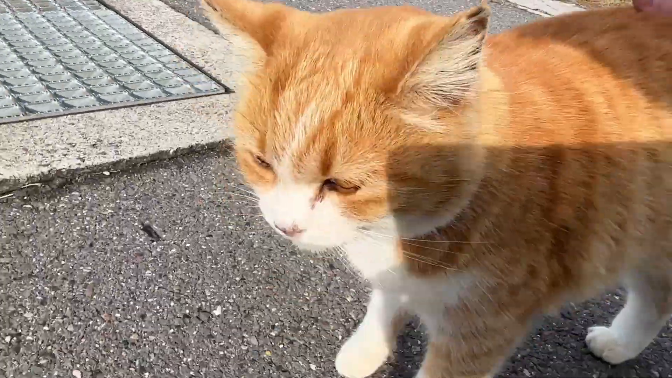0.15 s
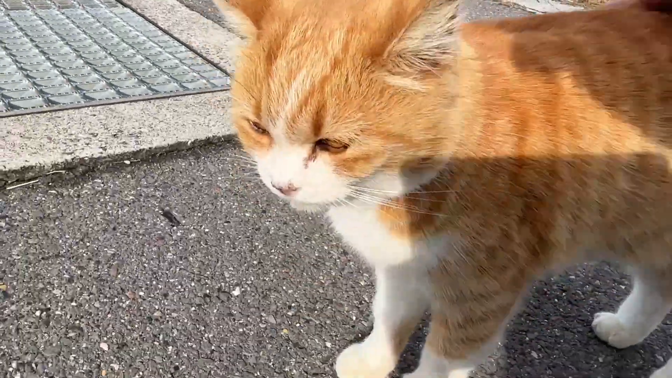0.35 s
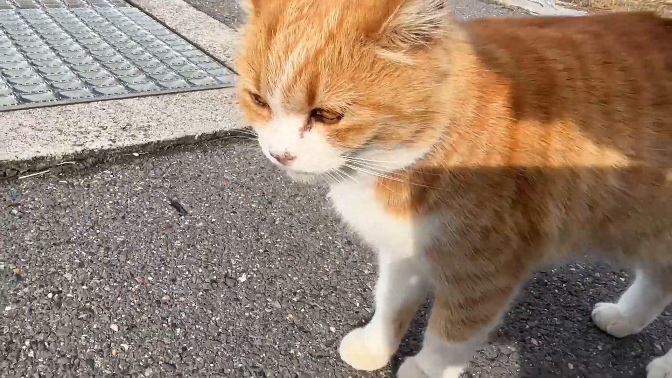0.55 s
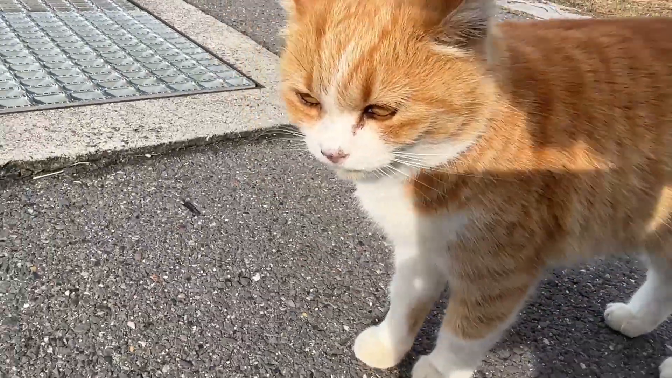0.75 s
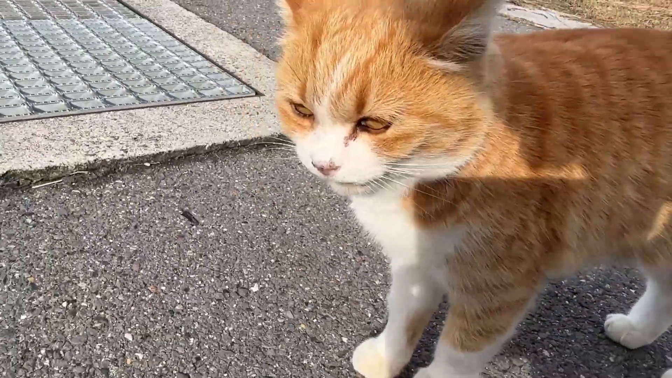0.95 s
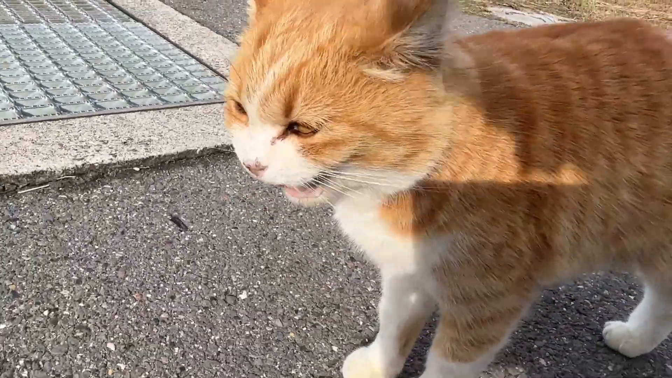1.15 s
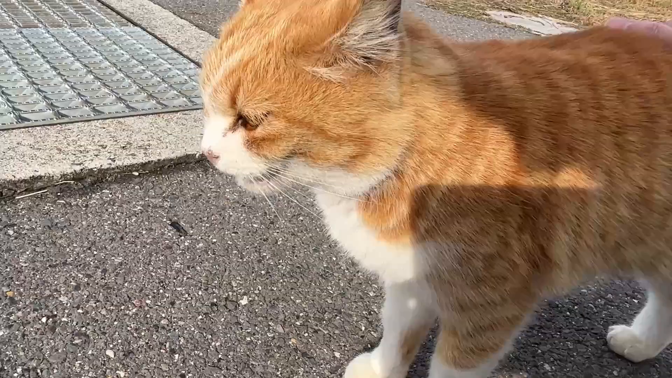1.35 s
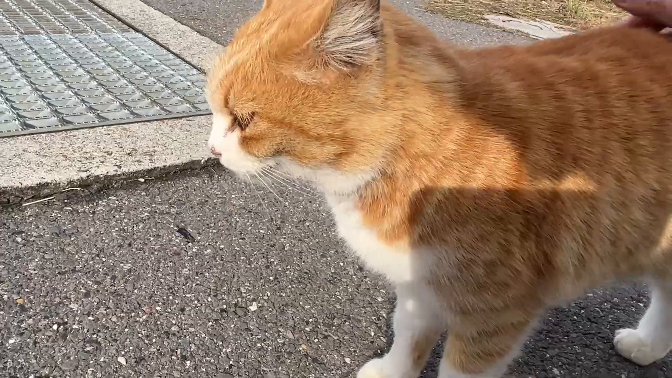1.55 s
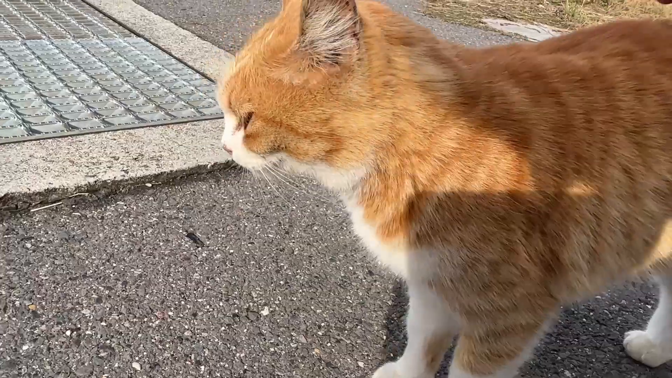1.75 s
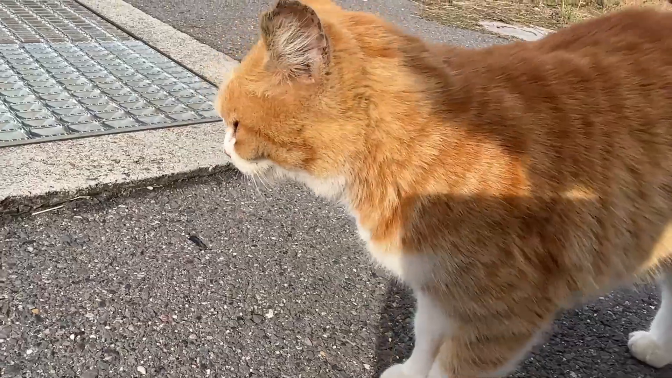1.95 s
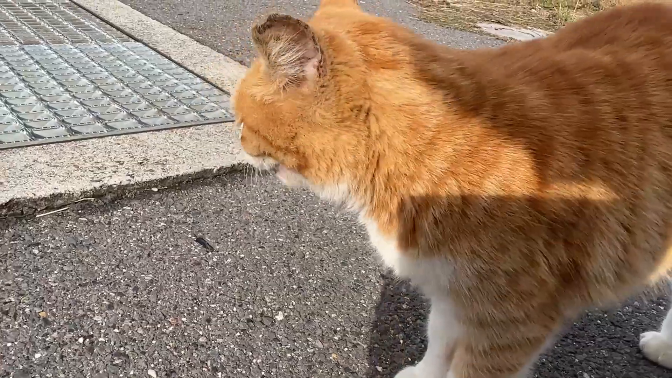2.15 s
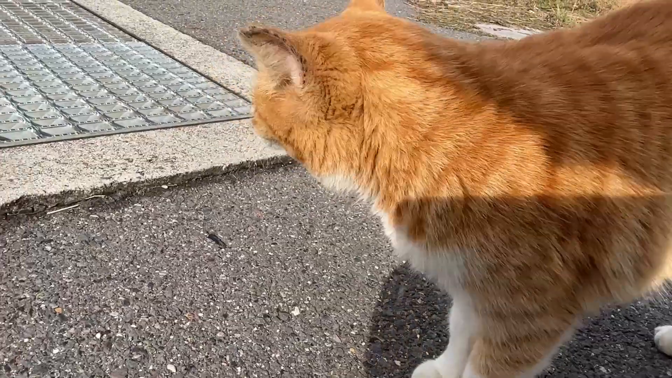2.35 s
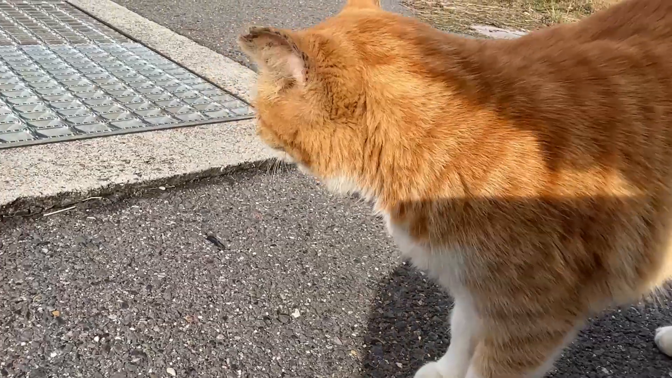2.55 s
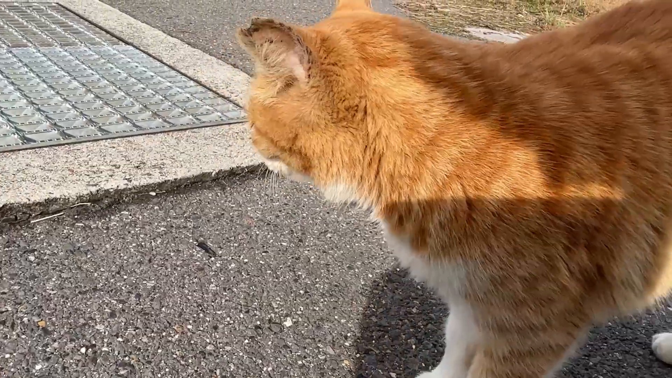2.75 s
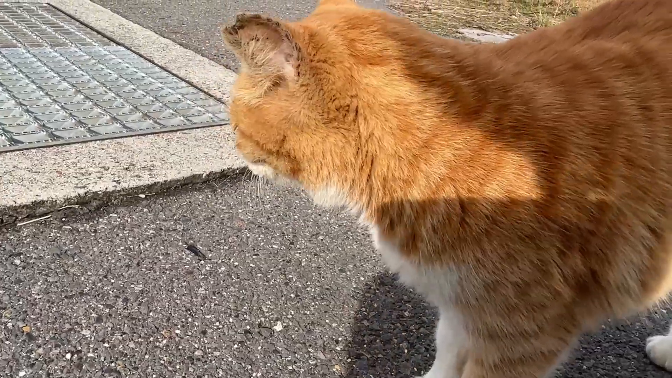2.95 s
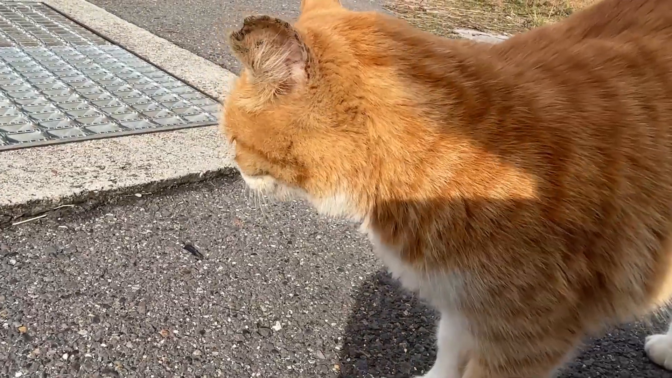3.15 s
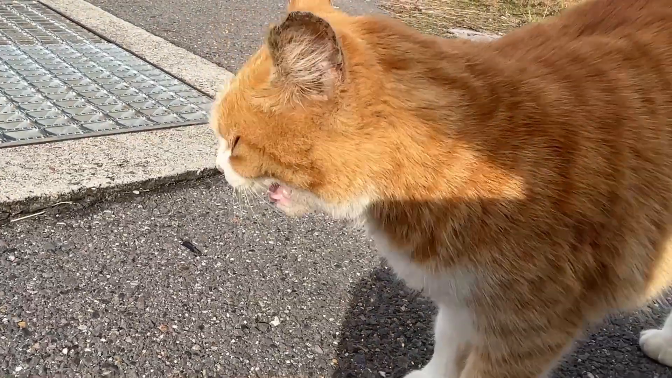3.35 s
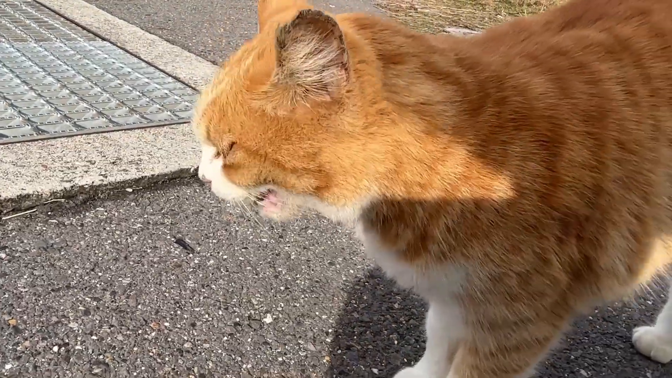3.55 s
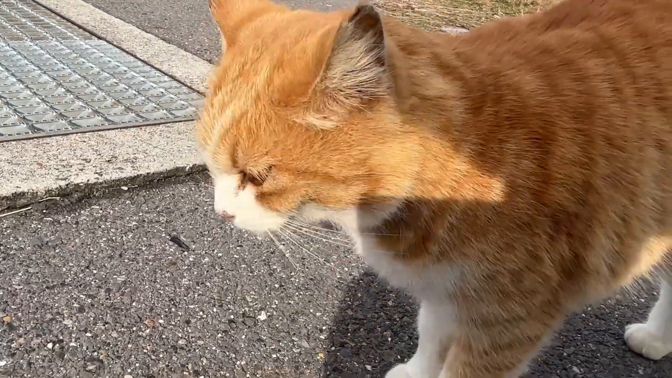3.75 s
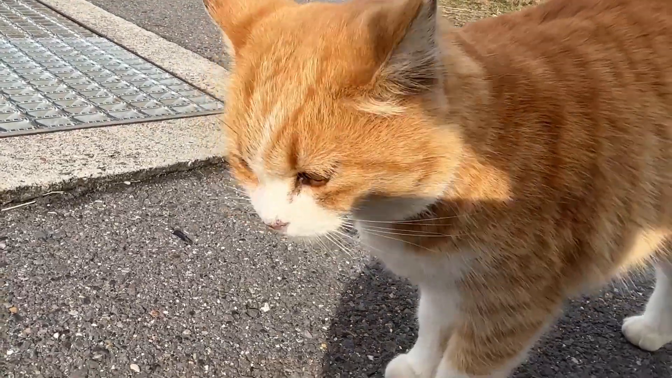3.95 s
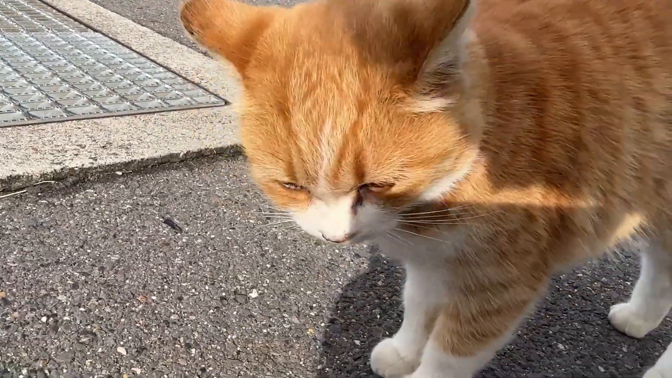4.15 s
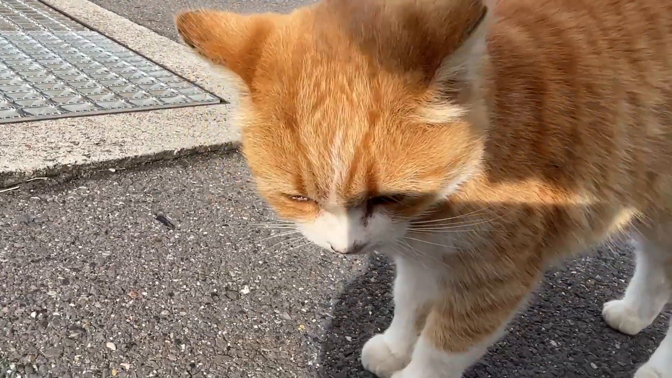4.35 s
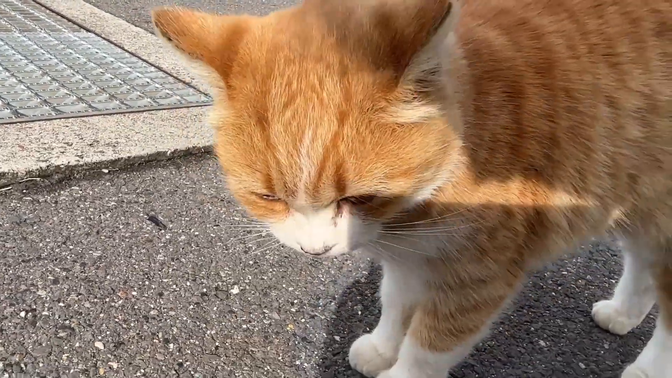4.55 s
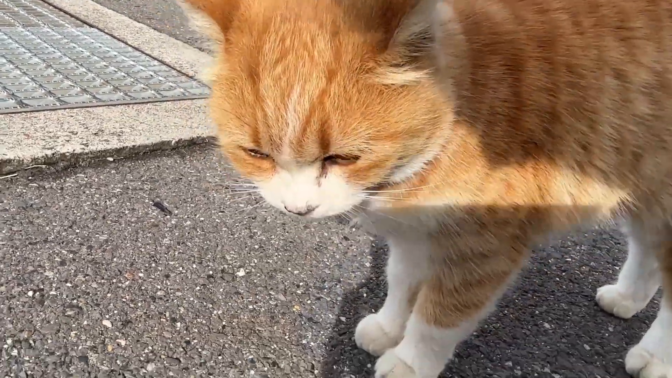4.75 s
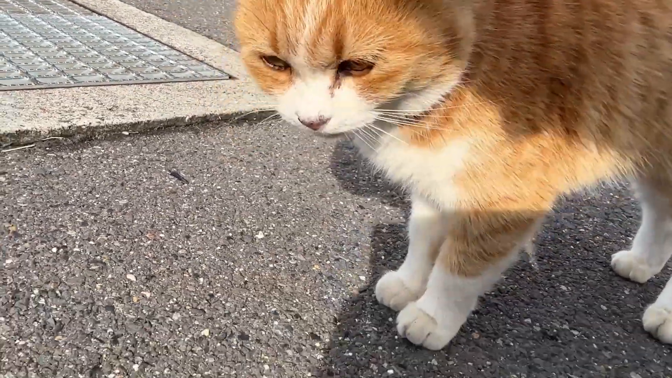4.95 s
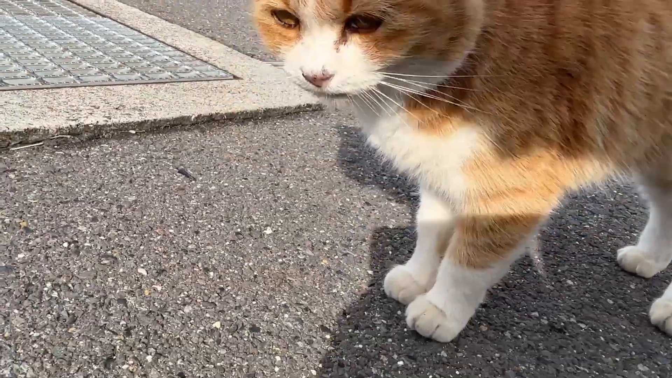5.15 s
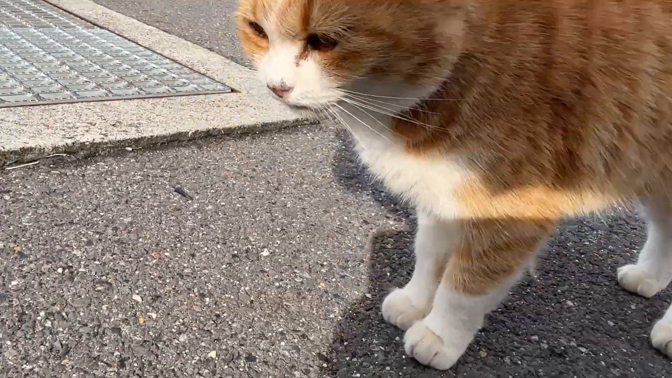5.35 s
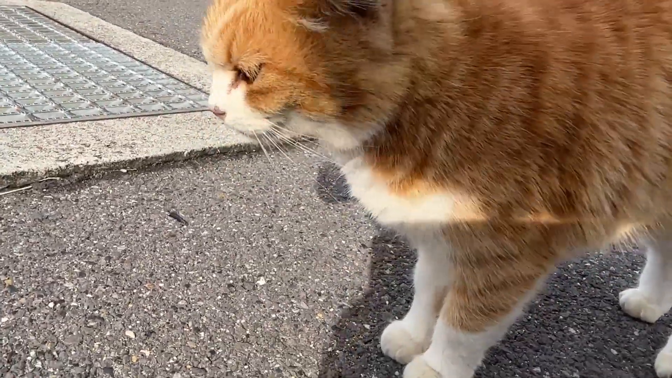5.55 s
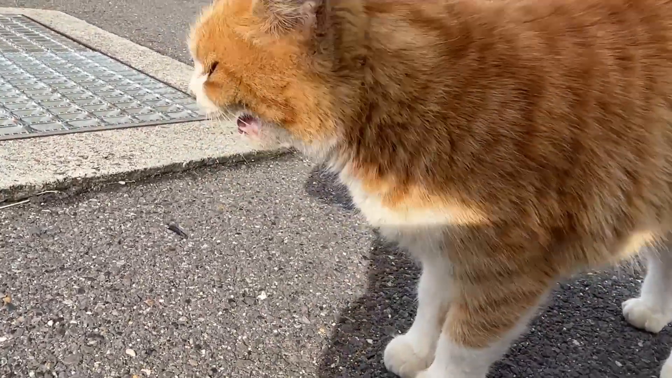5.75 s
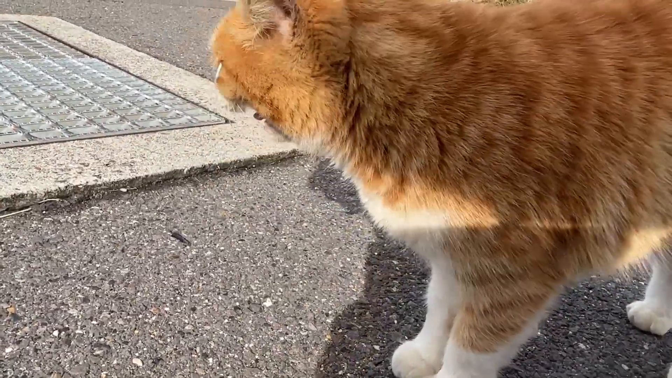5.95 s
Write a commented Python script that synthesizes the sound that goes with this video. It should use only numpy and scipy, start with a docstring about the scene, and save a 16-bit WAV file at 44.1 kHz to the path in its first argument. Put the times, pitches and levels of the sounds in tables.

```python
"""A cat trills four arched meows and two small murmurs close to a phone on an open pavement: fold harmonics
ring through throat, mouth and sinus, a purring muscle twitches through each call, breath hisses at some ends.
Sparrows chirp nearby as mostly arched whistles and falling flicks, with wall echoes; grit and handling tick
as short noise bursts in the housing. Far traffic hums as patchy noise with fuzzy engine drones."""
import sys
import numpy as np
from scipy import signal
from scipy.fft import rfft, irfft
from scipy.io import wavfile
from scipy.ndimage import uniform_filter1d

SR = 44100
rng = np.random.default_rng(int(sys.argv[2]) if len(sys.argv) > 2 else 0)


def inscribe(sig):
    """Save sig as 16-bit PCM at rate SR to the path in sys.argv[1].

    A 1-D sig is mono; a 2-D sig holds one channel per row.
    Samples are clipped to [-1, 1] before scaling.
    """
    pcm = np.round(np.clip(np.atleast_2d(sig).T, -1, 1) * 32767)
    wavfile.write(sys.argv[1], SR, pcm.astype(np.int16))


N = 268569  # samples

# Far traffic, spectrum shared by both ports: (frequency [Hz], relative density [dB])
HUM_SPECTRUM = [(12, -48), (20, -9.5), (60, 4), (146, -2.5), (216, -7), (574, -29.5), (1000, -33.5),
                (2200, -38.5), (3340, -41.5), (4060, -41), (4940, -45), (6910, -45.5), (9950, -67.5),
                (13900, -53), (16000, -93.5)]
# Far traffic, spectrum of the part opposite in sign at the ports: (frequency [Hz], relative density [dB])
HUM_SIDE_SPECTRUM = [(12, -35.5), (20, -2), (216, 0.5), (897, -18), (1060, -14), (1150, -17.5), (2320, -21),
                     (2670, -18.5), (3440, -30), (3950, -27.5), (4940, -30.5), (10200, -35), (12800, -47),
                     (14700, -54), (16000, -59.5)]
HUM_DB, HUM_SIDE_DB = -44, -58  # rms of the shared and opposite parts
# Fuzzy engine drones: (centre [Hz], width [Hz], level [dB])
DRONES = [(59.25, 17, -51), (120.2, 6.2, -51.5), (153, 6.9, -59), (188.4, 12, -62.5)]
# Traffic at the two ports: (frequency [Hz], left over right [dB])
HUM_BALANCE = [(60, 0), (180, -2.5), (550, -3), (1650, 2), (4970, 4.5), (15000, -2.5)]
# Traffic at the two ports: (frequency [Hz], left leads by [rad])
HUM_LEAD = [(0, 0.021), (300, 0.081), (1200, 0.3), (4000, 1), (16000, 0.22)]

# Grit and handling: (time [s], level [dB], treble tilt [dB], middle band lift [dB], decay by 60 dB [s])
TICKS = [(.132, -57, -8, -1.5, 0.029), (0.141, -47.5, 0, -7, 0.026), (0.185, -51, -7.5, 10.5, 0.012),
         (.225, -46.5, 1, 10, 0.081), (0.299, -53, 7, 2.5, 0.1006), (0.346, -58, -4.5, 3, 0.22),
         (0.405, -47.5, -10.5, -9, 0.02), (0.439, -56, -0.5, -2, 0.15), (.517, -52, 1, 2, .028),
         (.646, -39, 7.5, -10.5, 0.028), (.825, -37, 1, -7.5, 0.041), (1.002, -37.5, 1.5, -15, 0.023),
         (1.505, -58, -2.5, -3, .02), (2.886, -72.5, 29, -7, 0.019), (3.051, -43.5, 3, -0.5, 0.015),
         (3.579, -49, 9.5, -6, .025), (3.721, -56.5, 6, 4.5, 0.036), (4.07, -56, 3, 0, .025),
         (4.599, -55, 3, 0, 0.023), (5.14, -42, 0.5, -1.5, .02), (5.189, -55, 1, 5, .022),
         (5.326, -54.5, 4.5, -2, .025), (5.5, -46.5, 1, -4, 0.033), (5.556, -61.5, -8.5, 4, 0.018),
         (5.675, -46.5, -4, -12, 0.03)]
# Low, middle and high bands of the housing: (centre [Hz], width [Hz])
HOUSING_BANDS = [(1200, 1500), (4600, 5000), (11500, 13000)]
HOUSING_BANDS_DB, TICK_RISE_S = (0, -3.5, -16), 0.0017  # band levels before tilt and lift
# Ticks at the two ports: (frequency [Hz], left leads by [rad])
TICK_LEAD = [(0, 6), (1000, 1.28), (5000, 2), (6460, 1.5), (9040, -2), (10600, -4), (12100, -6),
             (13700, -3), (16000, -30)]

# Whistled notes, mostly arched sparrow chirps, with short upward flicks and one faint falling wheeze:
# (time [s], length [s], start [Hz], crest [Hz], end [Hz], crest at [share of length],
# level [dB], overtones re note [dB])
CHIRPS = [(1.197, 0.19, 3650, 4150, 3390, 0.6, -53.5, -20), (1.486, .018, 4408, 5100, 5050, 0.89, -56, -38),
          (1.49, .11, 3280, 5000, 3460, .78, -40.5, -57.5), (1.524, .13, 3190, 4100, 3380, .79, -58, -18.5),
          (1.738, 0.02, 4430, 5400, 5230, .94, -61.5, -28), (1.743, 0.11, 3060, 4740, 3130, 0.68, -43, -49),
          (1.998, 0.087, 3160, 4154, 3480, .89, -50.5, -27.5),
          (2.361, 0.1, 3780, 4690, 4260, .97, -48, -54), (3.651, 0.053, 4160, 4136, 2990, 0.079, -66, -8),
          (3.885, 0.17, 3500, 3858, 3430, 0.31, -58.5, -13),
          (3.933, .091, 3770, 4296, 4060, 0.998, -66, -21),
          (4.182, 0.097, 3180, 3954, 3600, 0.58, -56, -18.5),
          (4.391, 0.16, 3305, 4124, 3390, 0.54, -56.5, -15.5),
          (4.755, 0.09, 3990, 4525, 3900, .9, -50, -26.5), (4.792, 0.1, 3160, 3920, 3400, .98, -55, -16),
          (5.094, 0.016, 4540, 5430, 5550, .9, -60.5, -29.5),
          (5.101, 0.12, 3490, 4645, 3630, 0.56, -49, -33), (5.358, 0.11, 3400, 3916, 3440, 0.45, -55, -18)]
# Falling flicks that close a chirp: (time [s], length [s], crest [Hz], end [Hz], level [dB])
FLICKS = [(1.596, 0.028, 4760, 2840, -46), (1.839, 0.056, 4890, 3120, -54), (2.093, 0.017, 4860, 3260, -55),
          (2.48, .019, 5410, 4266, -62), (4.287, 0.026, 4437, 3600, -72), (4.512, .017, 5400, 4000, -59),
          (4.88, 0.024, 4710, 3650, -50.5), (5.212, 0.034, 3975, 2660, -58.5),
          (5.226, 0.041, 5361, 4429, -67), (5.237, 0.01, 5570, 4500, -63), (5.457, 0.041, 5410, 3840, -70)]
FLICK_START, FLICK_CREST, FLICK_OVERTONES_DB = 1.055, 0.1, -33  # start over crest pitch, share of length, dB
OCTAVE_DB, CHIRP_PAN_DB, FLICK_PAN_DB = 1, 3, 6.5  # octave re overtones, left over right

# Pitch of the taut folds, one table a call: (time [s], pitch [Hz])
FOLD_PITCH = [
    [(.78, 422.4), (.84, 492), (.91, 440)],
    [(.97, 580.4), (1.01, 557.3), (1.045, 585), (1.1, 636.4), (1.2, 675.3), (1.27, 643.3), (1.31, 629.7),
     (1.36, 498.4)],
    [(2.09, 500), (2.12, 569), (2.155, 590)],
    [(2.19, 552), (2.23, 609.6), (2.27, 611.5), (2.31, 652), (2.39, 658), (2.45, 646), (2.51, 629),
     (2.56, 489)],
    [(3.19, 450), (3.25, 525.5), (3.31, 585), (3.34, 581.7), (3.39, 586), (3.44, 621.4), (3.5, 624.3),
     (3.55, 608), (3.63, 516)],
    [(5.63, 471.5), (5.67, 546), (5.72, 540), (5.79, 602.4), (5.85, 611.5), (5.9, 624.3), (5.99, 599.5),
     (6.03, 605), (6.09, 498)],
]
# Mouth, one table a call: (time [s], effort [dB], mouth resonance [Hz], opening [0-1], front resonance [dB])
MOUTH_MOVES = [
    [(0.78, -69.5, 1790, .3, -30), (0.796, -51.5, 1780, 0.06, -35), (0.822, -60, 1770, .2, -20),
     (0.852, -43.5, 1920, 0.41, -32), (0.91, -60.5, 2049, 0.46, -9)],
    [(0.972, -58, 1780, .5, -28), (0.98, -37.5, 1711, .7, -10.5), (1.0, -35.5, 1960, 0.62, -14.5),
     (1.05, -38, 1960, 0.82, -6), (1.096, -40.5, 2000, 0.77, -3), (1.214, -37, 2180, 0.78, -0.5),
     (1.322, -41.5, 2124, 0.77, -2.5), (1.336, -38, 2170, 0.52, -16), (1.37, -65, 2220, 0.3, 13)],
    [(2.09, -67, 2240, 0, 6), (2.128, -48.5, 2140, 0.18, -18), (2.155, -72, 2160, .2, -5)],
    [(2.193, -45.5, 1870, 0.68, -11), (2.221, -38.5, 2176, 0.86, -17), (2.295, -40, 2490, 0.92, -2),
     (2.335, -34, 2540, 0.84, -26), (2.391, -37, 2430, 0.82, -11), (2.433, -41, 2106, 0.84, -8.5),
     (2.513, -40.5, 1855, 0.85, -7), (2.537, -40.5, 1680, 0.72, -21), (2.56, -56.5, 1760, .45, 3.5)],
    [(3.195, -55, 1800, 0, -46), (3.245, -41, 2480, 0.29, -25), (3.289, -40, 1840, 0.34, -22),
     (3.321, -48.5, 1590, 0.78, -9.5), (3.373, -39.5, 2110, .87, -10), (3.417, -38, 2300, .87, 3),
     (3.471, -42, 2450, 0.88, -21), (3.555, -38.5, 2147, .87, -7), (3.605, -38.5, 1600, .65, -10),
     (3.63, -69, 1950, 0.1, -17.5)],
    [(5.635, -66, 1910, .02, -10), (5.659, -44.5, 1760, 0.08, -38), (5.697, -35.5, 1722, 0.73, -21),
     (5.715, -39, 1806, 0.74, -10), (5.825, -43, 2260, 0.99, -1.5), (5.895, -38.5, 2450, 0.96, -.5),
     (5.967, -43.5, 2310, 0.97, -15), (6.047, -42.5, 1928, 0.89, -3.5), (6.063, -50, 2080, 0.25, -4),
     (6.09, -73, 2090, 0.15, 20)],
]
# One row a call: (front resonance [Hz], sinus resonance at start [Hz], at end [Hz], sinus strength [dB],
# creak at start [0-1], its fade by a factor e^1.5 [s], creak at end [0-1])
VOICES = [(3400, 6400, 5800, 8, 0.54, 1.8, .05), (3210, 7520, 6600, 3, 0.07, 0.036, 0.83),
          (3430, 6700, 6300, -3, 0.16, 2.0, 0.16), (3460, 6760, 7300, -7.5, .1, 0.0084, 0.3),
          (3380, 6000, 7940, -1.5, .3, 0.11, 0.3), (3320, 6940, 6930, -6.5, 0.07, 0.04, 0.75)]
# Bouts of the purring muscle: (first twitch [s], last twitch [s], twitch rate [1/s],
# pitch drop at first [Hz], at last [Hz], level dip at first [dB], at last [dB])
TWITCH_BOUTS = [(0.802, 0.96, 32, 34.9, 154, 6, 10), (.992, 1.176, 31, 78.7, 20, 8, 2.5),
                (1.247, 1.314, 30, 54.6, 52.3, 9.5, 2.5), (1.351, 1.348, 30, 174.4, 180, -4, -4),
                (2.123, 2.215, 11, 44.6, 38, 25, 2), (2.4, 2.533, 31, 24.2, 80, -1, 12),
                (3.203, 3.265, 34, 24.92, 130, 20.5, 13), (3.297, 3.384, 33, 73, 27, 7.5, 2),
                (3.504, 3.597, 33, 23.2, 115, 0, 11.5), (5.656, 5.706, 38, 55.3, 77, 18, 8.5),
                (5.737, 5.863, 32, 87.7, 12, 7.5, -3), (6.003, 6.063, 34, 82.8, 48, 7.5, -1)]
SAG_ONSET_S, SAG_RECOVERY_S, DIP_WIDTH_S, DIP_EARLY_S = .004, .011, .0025, .002  # deeper dips are wider
HELD_CREAK, DYING_S = .008, .028  # creak of a held note; how soon before the end it breaks up
MOUTH_DB, SINUS_DB, NOSE_DB = (-33, 16.5), (-58, -13), (6, -17.5)  # each from shut to open mouth
THROAT = (1120, 470, 0)  # centre Hz, width Hz, level dB
PALATE, TOP = (5150, 800, 0), (8500, 1700, -41)  # centre Hz, width Hz, level dB re sinus
# Brief swells as the fourth harmonic sags through a narrow mouth resonance: (time [s], level [dB])
MOUTH_SWELLS = [(1.056, -25.5), (1.087, -59), (1.251, -31), (1.283, -35.5), (1.316, -26.5), (3.362, -50),
                (3.533, -54.5), (3.565, -41), (5.74, -41), (6.005, -41), (6.036, -47)]
# Air through the mouth as a call dies: (time [s], hold [s], level [dB], release [dB/s])
PUFFS = [(1.34, 0.018, -49, 700), (2.523, 0.048, -55.5, 268), (3.586, 0.02, -50.5, 185),
         (6.096, .035, -46.5, 300)]
# Spectrum of that air: (frequency [Hz], relative density [dB])
PUFF_SPECTRUM = [(290, -14), (500, 18.5), (758, -39), (1350, -3), (1620, 16), (3580, 0.5), (5750, -26),
                 (7130, 7.5), (9110, 0), (9790, -64.5), (10200, -18.5), (11600, -11), (15500, -23.5)]
PUFF_RISE_DB_PER_S, PUFF_LUMPS_DB, PUFF_CHOP = 347, 2.5, 2.5  # chop: dB of air lost per dB of twitch dip
CAT_PAN_DB = -2.5  # calls only, left over right, added to the balance below
# Cat at the two ports: (frequency [Hz], left over right [dB])
CAT_BALANCE = [(60, -26), (110, 12), (200, 9), (380, 5), (700, 4.5), (1290, 10), (2380, 6.5), (4400, 14),
               (8120, 2), (15000, -1.5)]
# Cat at the two ports: (frequency [Hz], left leads by [rad])
CAT_LEAD = [(0, 0), (520, .9), (1300, .8), (2330, 1.4), (2840, 2.3), (3620, 1.7), (4650, .2), (6200, .4),
            (8100, -.9), (9800, -3.2), (12000, -6.2), (13700, -6.4), (16000, -11)]

EDGE_HZ = 16000  # upper band limit


def amp(db):
    """Amplitude factor of a level in dB."""
    return 10 ** (np.asarray(db) / 20)


def evened(x):
    """Scales to rms 1."""
    return x / np.sqrt(np.mean(x ** 2) + 1e-20)


def read(points, hz):
    """Reads a curve along log frequency."""
    f, value = np.transpose(points)
    return np.interp(np.log(hz + 1), np.log(f + 1), value)


def peak(hz, centre_hz, width, db):
    """Power gain of a resonance with steep skirts, 9 dB down at the edges of its width."""
    return amp(2 * db) / (1 + (2 * (hz - centre_hz) / width) ** 2) ** 3


def coloured(gain, length):
    """Noise of rms 1 with a given spectrum."""
    return evened(irfft(rfft(rng.standard_normal(length)) * gain, length))


def wobble(width, *shape):
    """Smooth random drift of rms 1, averaged twice over width samples."""
    return evened(uniform_filter1d(uniform_filter1d(rng.standard_normal(shape), width), width))


def add(mix, s, sound, pan_db=0):
    """Mixes a sound in at time s, split between the two channels."""
    part = mix[:, round(s * SR):][:, :len(sound)]
    sides = sound * amp([[pan_db / 2], [-pan_db / 2]])
    part += sides[:, :part.shape[1]]


def ports(x, balance, lead):
    """Two microphone ports: level and phase differ by frequency."""
    hz = np.fft.rfftfreq(N, 1 / SR)
    side = np.array([[.5], [-.5]])
    return irfft(rfft(x) * amp(side * read(balance, hz)) * np.exp(1j * side * read(lead, hz)), N)


def yard(x, t60, first=0.012):
    """Sparse echoes of random sign off walls, later than first seconds, different at each port."""
    taps = rng.choice([-1., 1.], (2, SR)) * (rng.random((2, SR)) < .05)
    t = np.arange(SR) / SR
    taps *= amp(-60 * t / t60) * (t > first)
    return signal.fftconvolve(x.mean(0)[None], taps / np.linalg.norm(taps[0]), axes=1)[:, :N]


def hum():
    """Far traffic: patchy noise, part of it unlike at the two ports, with a few fuzzy engine drones."""
    frames, hz = N // 512 + 5, np.fft.rfftfreq(2048, 1 / SR)
    a, b, c, d, patches = rng.standard_normal((frames, 1025, 5)).T
    patches = evened(uniform_filter1d(uniform_filter1d(patches, 14, 0), 6, 1))  # over frequency, then time
    spectra_db = np.array([read(HUM_SPECTRUM, hz), read(HUM_SIDE_SPECTRUM, hz)])[:, :, None]
    frames_of_noise = np.array([a + 1j * b, c + 1j * d]) * amp(spectra_db + 1.2 * patches)
    mid, side = signal.istft(frames_of_noise, nperseg=2048, noverlap=1536)[1][:, :N]
    fine_hz = np.fft.rfftfreq(N, 1 / SR)
    drones = sum(amp(db) * coloured(np.sqrt(peak(fine_hz, f, w, 0)), N) for f, w, db in DRONES)
    shared = ports(amp(HUM_DB) * evened(mid) + drones, HUM_BALANCE, HUM_LEAD)
    return shared + amp(HUM_SIDE_DB) * evened(side) * [[1], [-1]]


def ticks():
    """Grit and handling: a sharp snap, then a short dying burst, in three broad bands of the housing."""
    out, t, hz = np.zeros((2, N)), np.arange(3000) / SR, np.fft.rfftfreq(3000, 1 / SR)
    snap = 1 + 1.4 * np.exp(-(t / 0.0032) ** 2)
    rise = np.minimum(t / TICK_RISE_S, 1)
    for s, db, tilt_db, lift_db, t60 in TICKS:
        bands_db = HOUSING_BANDS_DB + np.array([-tilt_db, lift_db, tilt_db])
        burst = sum(amp(band_db) * coloured(np.sqrt(peak(hz, f, w, 0)), 3000)
                    for band_db, (f, w) in zip(bands_db, HOUSING_BANDS))
        decay = amp(db - 60 * t / max(t60, .004))
        add(out, s - .0015, burst * decay * snap * rise)
    return ports(out, [(0, 0), (SR, 0)], TICK_LEAD)


def whistled_note(length, start_hz, crest_hz, end_hz, crest, db, overtones_db):
    """Whistle: a slowing glide to the crest, then a steepening glide to the end; returns it near and as echoed."""
    u = np.linspace(0, 1, round(length * SR))
    n = len(u)
    before = np.maximum(1 - u / crest, 0)
    after = np.maximum((u - crest) / (1 - crest), 0)
    hz = crest_hz - (crest_hz - start_hz) * before ** 1.7 - (crest_hz - end_hz) * after ** 2.4
    turn = 2 * np.pi * np.cumsum(hz * (1 + .006 * wobble(60, n))) / SR
    # breathy haze, more in faint birds
    rasp = wobble(36, n) * np.sin(turn) + wobble(36, n) * np.cos(turn)
    rasp *= .16 * amp(-.5 * (db + 50))
    # the second side of the syrinx sweeps wider
    upper_hz = 3 * crest_hz / 2 - 2000 * before ** 4 - 1800 * after ** 4
    upper_turn = 2 * np.pi * np.cumsum(upper_hz * (1 + .012 * wobble(40, n))) / SR
    upper_db = overtones_db + 17 * before ** 1.8 + 5 * after + 5 * wobble(50, n)
    upper = amp(upper_db) * np.sin(upper_turn)
    octave = amp(overtones_db + OCTAVE_DB) * (0.38 + 0.48 * wobble(60, n)) * np.sin(2 * turn)
    crest_db = 2.5 * wobble(150, n) - 22 * before ** 1.8 - 8 * after  # loudest at the crest
    note = np.sqrt(2) * amp(db + crest_db) * (np.sin(turn) + rasp + upper + octave)
    note *= signal.windows.tukey(n, .2)
    haze = 2.0 * np.sqrt(2) * amp(db + crest_db / 2) * rasp * np.hanning(n)
    return note, (note + haze) * amp(-.25 * (db + 60))


def sparrows():
    """Whistled notes and flicks at the ports and off the walls; faint birds are far, so more echo."""
    near, far = np.zeros((2, 2, N))
    notes = [(*row, CHIRP_PAN_DB) for row in CHIRPS]
    for s, length, hz, end_hz, db in FLICKS:
        notes.append((s, length, FLICK_START * hz, hz, end_hz, FLICK_CREST, db, FLICK_OVERTONES_DB, FLICK_PAN_DB))
    for s, *shape, pan_db in notes:
        note, echoed = whistled_note(*shape)
        add(near, s, note, pan_db)
        add(far, s, echoed)
    direct = ports(near, [(0, 0), (SR, 0)], [(0, 0.045), (3000, 1.0), (8000, 1.0)])
    return direct + amp(-13.5) * yard(far, 0.098, .003) + amp(-3.5) * yard(far, 0.14) + amp(-5.5) * yard(far, 0.94)


def breath(dip):
    """Turbulent air hissing through the cat's mouth as calls die, chopped by the twitches."""
    air = coloured(amp(read(PUFF_SPECTRUM, np.fft.rfftfreq(N, 1 / SR))), N)
    lumps = evened(uniform_filter1d(rng.standard_normal(N), 250))
    air *= amp(PUFF_LUMPS_DB * lumps - PUFF_CHOP * dip)
    t, level = np.arange(N) / SR, np.zeros(N)
    for s, hold, db, release_db in PUFFS:
        rise_db = PUFF_RISE_DB_PER_S * np.maximum(s - t, 0)
        level += amp(db - rise_db - release_db * np.maximum(t - s - hold, 0))
    return air * level


def mouth_swells():
    """Brief swells near 2280 Hz as the fourth harmonic sags through a narrow mouth resonance."""
    out, t = np.zeros((2, N)), np.arange(-300, 900) / SR
    swell = np.exp(-(t / np.where(t < 0, .003, .006)) ** 2) * np.sin(2 * np.pi * 2280 * t)
    for s, db in MOUTH_SWELLS:
        add(out, s + t[0], amp(db) * swell)
    return out


def purr():
    """Each twitch slackens the folds at once, then they tighten; the level changes, mostly dips, as they part."""
    t, sag, dip = np.arange(N) / SR, np.zeros(N), np.zeros(N)
    for first, last, rate, hz0, hz1, db0, db1 in TWITCH_BOUTS:
        for share in np.linspace(0, 1, round((last - first) * rate) + 1):
            at = first + (last - first) * share
            hz = hz0 * (hz1 / hz0) ** share
            db = db0 + (db1 - db0) * share
            near = slice(round((at - .03) * SR), round((at + .08) * SR))
            u = t[near] - at
            onset, recovery = np.exp(-(u / SAG_ONSET_S) ** 2), np.exp(-abs(u / SAG_RECOVERY_S) ** 1.76)
            sag[near] += hz * np.where(u < 0, onset, recovery)
            width = DIP_WIDTH_S * (1 + 0.012 * db)
            dip[near] += db * np.exp(-.5 * ((u + DIP_EARLY_S) / width) ** 2)
    return sag, dip


def vocal_tract(line_hz, mouth_hz, opening, front_db, front_hz, sinus_hz, strength_db):
    """Power gain of each fold harmonic through throat, mouth, front and sinus; the lowest through the nose."""
    mouth_db, sinus_db, nose_db = (shut + (wide - shut) * opening for shut, wide in (MOUTH_DB, SINUS_DB, NOSE_DB))
    sinus_db = sinus_db + strength_db
    power = peak(line_hz, *THROAT) + peak(line_hz, mouth_hz, 680, mouth_db)
    power += peak(line_hz, front_hz, 1040, front_db) + peak(line_hz, sinus_hz, 1680, sinus_db)
    power += amp(2 * sinus_db) * (peak(line_hz, *PALATE) + peak(line_hz, *TOP))
    power *= 1 - peak(line_hz, 5250, 1900, -.15)  # a side cavity swallows the lines below the sinus
    power *= 1 - peak(line_hz, 9300, 3000, -.1)  # and the lips those above it
    power[0] = amp(2 * nose_db)
    return power


def meow(pitch, rows, voice, sag, dip):
    """Harmonics of the folds, weighted by the vocal tract; creak smears each line into noise."""
    s, *columns = np.transpose(rows)
    at = np.arange(round(s[0] * SR), min(round(s[-1] * SR), N))
    t, n = at / SR, len(at)
    effort_db, mouth_hz, opening, front_db = (np.interp(t, s, c) for c in columns)
    front_hz, start_hz, end_hz, strength_db, first, fading, last = voice
    sinus_hz = np.linspace(start_hz, end_hz, n)
    creak = HELD_CREAK + first * np.exp(1.5 * (s[0] - t) / fading) + last * np.exp((t - s[-1]) / DYING_S)
    jitter = (.002 + .0002 * sag[at] + .06 * creak) * wobble(70, n)
    hz = (np.interp(t, *np.transpose(pitch)) - sag[at]) * (1 + jitter)
    k = np.arange(1, 25)[:, None]  # harmonic number
    smear = creak * (1 + k / 8) + .003 * k + .0017 * k ** 2 + .0012 * sag[at]  # upper lines smear first
    smear = np.minimum(smear, .95)
    power = vocal_tract(k * hz, mouth_hz, opening, front_db, front_hz, sinus_hz, strength_db)
    shimmer = amp(.03 * np.minimum(k, 11) ** 2 * wobble(500, *power.shape))  # upper lines flutter more
    a, b = wobble(40, 2, *power.shape)
    turn = k * (2 * np.pi * np.cumsum(hz) / SR - 1.184 * np.sqrt(k))
    steady = np.sqrt(2 - 2 * smear ** 2) * np.cos(turn)
    noisy = smear * (a * np.cos(turn) + b * np.sin(turn))
    tone = (np.sqrt(power) * shimmer * (steady + noisy)).sum(0)
    return s[0], tone * amp(effort_db - dip[at]) * signal.windows.tukey(n, 400 / n)


def cat():
    """The calls, their mouth swells and breath, as they reach the two ports."""
    sag, dip = purr()
    out = mouth_swells() + breath(dip)
    for pitch, rows, voice in zip(FOLD_PITCH, MOUTH_MOVES, VOICES):
        add(out, *meow(pitch, rows, voice, sag, dip), CAT_PAN_DB)
    return ports(out, CAT_BALANCE, CAT_LEAD)


def scene():
    """Traffic, ticks and sparrows behind the close cat and its faint wall echoes."""
    background = hum() + ticks() + sparrows()
    voice = cat()
    return background + voice + amp(-22.0) * yard(voice, 0.33, 0.011)


def record(dry):
    """The microphone drops the deepest bass; then the band limit of the recorder."""
    thinned = signal.sosfilt(signal.butter(3, 42, "high", fs=SR, output="sos"), dry)
    band_limit = signal.firwin(511, EDGE_HZ, window=("kaiser", 9), fs=SR)
    return signal.oaconvolve(thinned, band_limit[None], "same")


dry = scene()
out = record(dry)
inscribe(out)
```